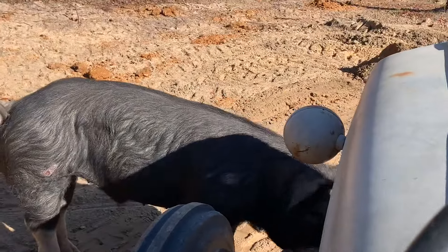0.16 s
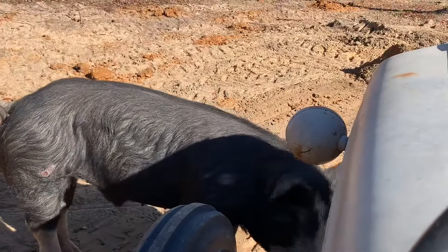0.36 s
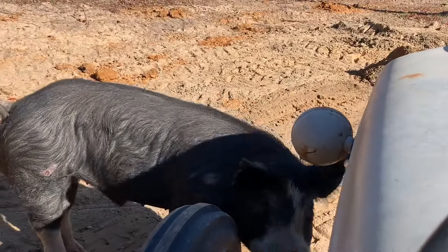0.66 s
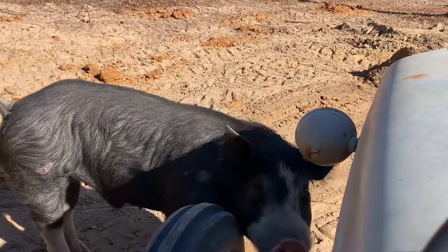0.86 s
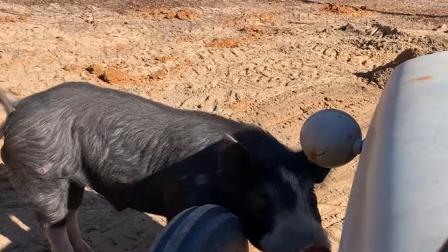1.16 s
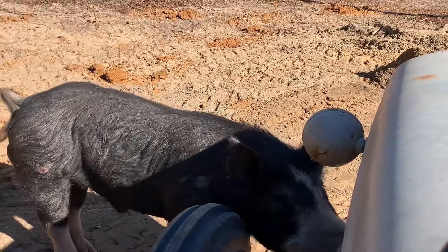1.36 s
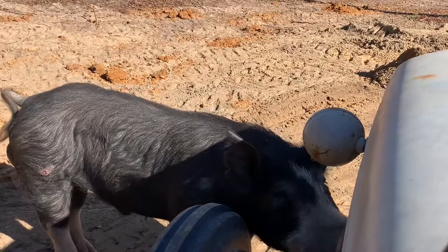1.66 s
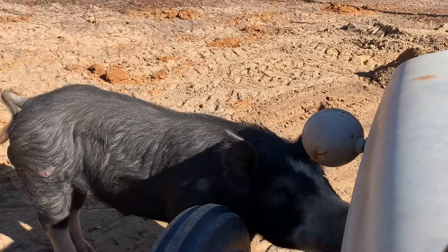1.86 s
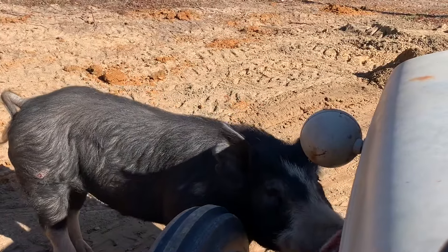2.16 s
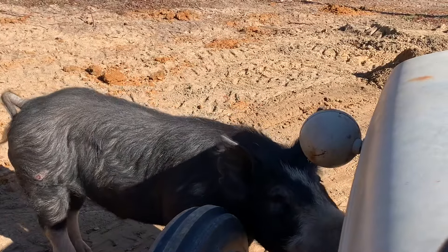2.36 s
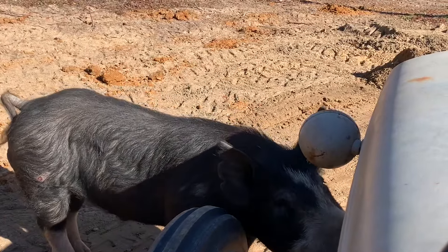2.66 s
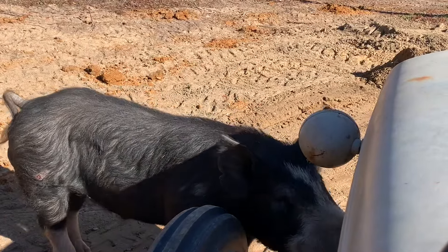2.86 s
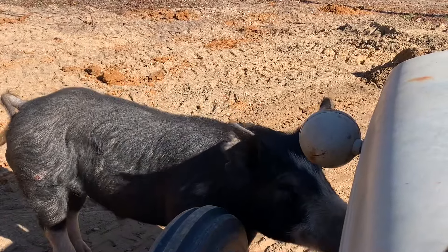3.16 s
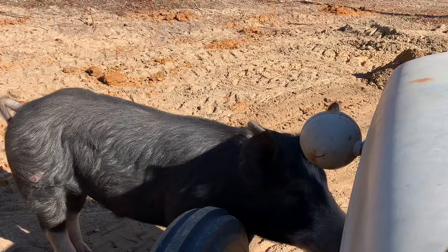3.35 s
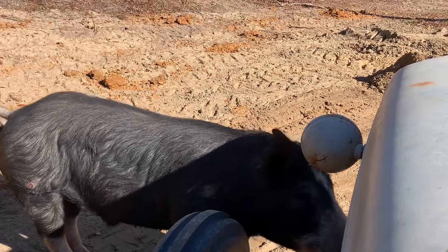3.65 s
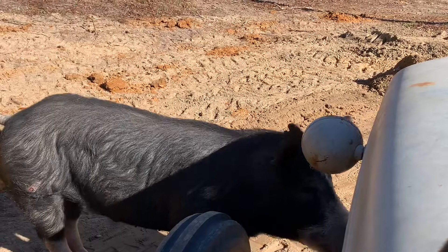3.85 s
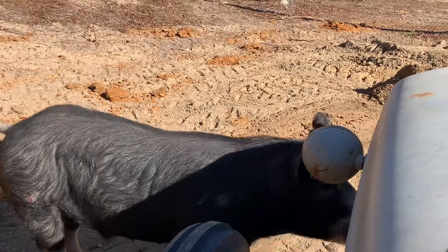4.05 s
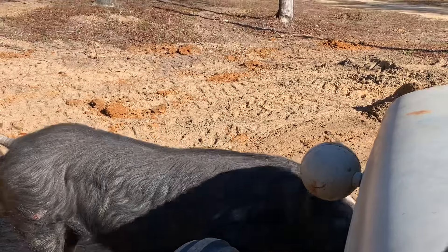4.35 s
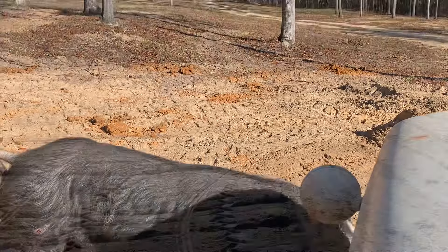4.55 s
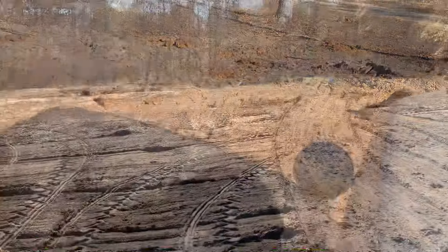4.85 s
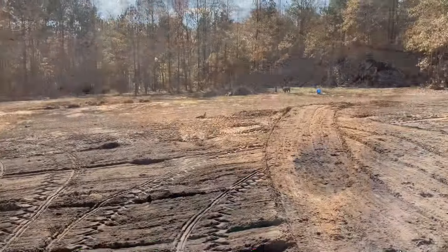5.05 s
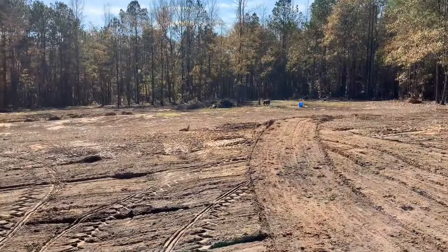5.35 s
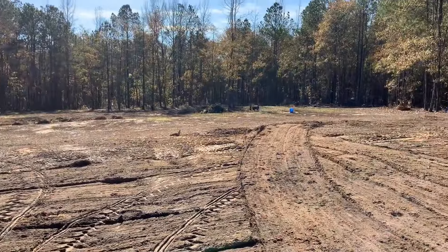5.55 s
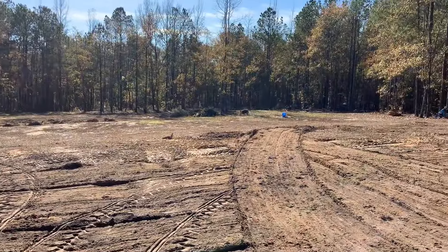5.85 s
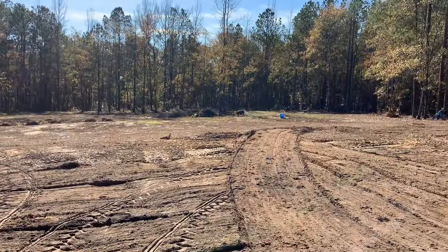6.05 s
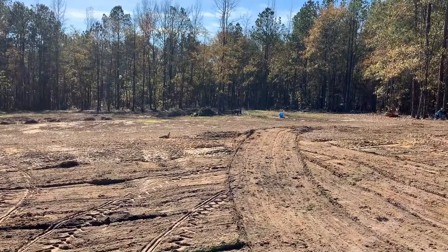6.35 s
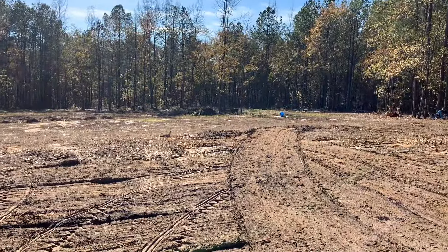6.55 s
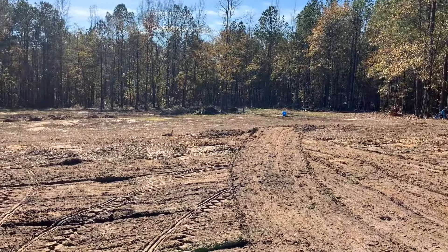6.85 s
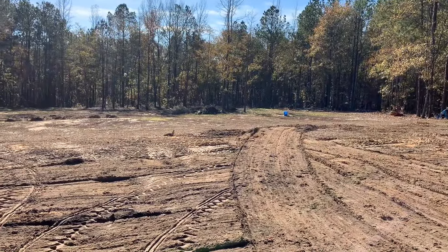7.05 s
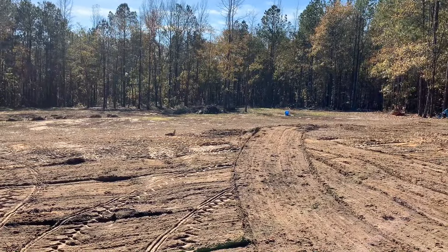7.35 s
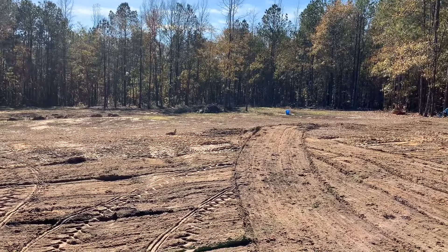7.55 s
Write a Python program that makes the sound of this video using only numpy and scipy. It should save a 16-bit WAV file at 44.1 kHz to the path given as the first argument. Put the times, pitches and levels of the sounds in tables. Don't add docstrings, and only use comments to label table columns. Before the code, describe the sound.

Very close outdoors, a pig gives a short sniff, then one loud, fluttering snort just after a second in. Breathy sniffs follow, with lip smacks and dull hollow booms as its head bumps a metal tank. A sharp hoof crack and a cluster of knocks and rustles lead into a softer open field, with a far low engine hum, scattered steps and a thin cricket.

```python
import sys
import numpy as np
from scipy import signal
from scipy.fft import rfft, irfft, next_fast_len
from scipy.io import wavfile
from scipy.ndimage import uniform_filter1d

SR = 44100
rng = np.random.default_rng(int(sys.argv[2]) if len(sys.argv) > 2 else 0)


def volts_from_db(level):
    exponent = np.asarray(level, float) / 20
    return 10 ** exponent


def dump(signal):
    limited = np.clip(np.atleast_2d(signal).T, -1, 1)
    pcm = np.round(limited * 32767).astype(np.int16)
    wavfile.write(sys.argv[1], SR, pcm)


N = 339119
T = np.arange(N) / SR

FADE_START_S, FADE_END_S = 4.45, 5.37
EDGE_DB, SQUARE = -28, 2.9


def evened(x):
    return x / np.sqrt(np.mean(x ** 2) + 1e-20)


def read(points, hz):
    f, value = np.transpose(points)
    return np.interp(np.log(hz + 1), np.log(f + 1), value)


def add(mix, s, sound):
    part = mix[..., round(s * SR):][..., :sound.shape[-1]]
    part += sound[..., :part.shape[-1]]


def resonate(x, hz, width):
    r, turn = np.exp(-np.pi * width / SR), np.cos(2 * np.pi * hz / SR)
    return 2 * (1 - r) * signal.lfilter([1, -r * turn], [1, -2 * r * turn, r * r], x)


def resonate_twice(x, hz, width):
    return resonate(resonate(x, hz, width), hz, width)


def butter(x, order, hz, kind):
    return signal.sosfilt(signal.butter(order, hz, kind, fs=SR, output="sos"), x)


def pair(same):
    a, b = rng.standard_normal((2, N))
    side = np.sqrt((1 - same) / (1 + same))
    return np.array([a + side * b, a - side * b])


def wander(rate_hz):
    return evened(resonate_twice(rng.standard_normal(N), 0, 2 * rate_hz))


def ring(modes, seconds):
    t = np.arange(round(seconds * SR)) / SR
    hz, db, t60 = np.transpose(modes)[:, :, None]
    return volts_from_db(db - 60 * t / t60) * np.sin(2 * np.pi * hz * t)


def strokes(start, length, db, sag_db=0):
    lean = 0.91
    power = np.zeros(N)
    for s, span, top_db in zip(start, length, db):
        at = slice(max(round(s * SR), 0), round((s + span) * SR))
        u = (T[at] - s) / span
        arch_db = EDGE_DB * abs(2 * np.clip(u, 0, 1) ** lean - 1) ** SQUARE
        power[at] += volts_from_db(top_db + arch_db + sag_db * (u - .5)) ** 2
    return np.sqrt(power)


def air(colour, patchy_db, gust_db):
    # frequency in Hz, likeness from 0 to 1.
    likeness = [(60, 0.95), (290, 0.92), (640, 0.077), (1400, 0.022), (4500, 0.02), (6500, 0.476),
                (16000, .99)]
    frames, hz = N // 512 + 5, np.fft.rfftfreq(2048, 1 / SR)
    a, b, c, d, patches = rng.standard_normal((frames, 1025, 5)).T
    patches = evened(uniform_filter1d(uniform_filter1d(patches, size=16, axis=0), size=6, axis=1))
    gust = evened(uniform_filter1d(rng.standard_normal(frames), size=12))
    same = np.clip(read(likeness, hz), 0, .999)[:, None]
    side = np.sqrt((1 - same) / (1 + same)) * (c + 1j * d)
    z = np.array([a + 1j * b + side, a + 1j * b - side]) * np.sqrt((1 + same) / 2)
    lumps_db = gust_db * gust / (1 + (hz[:, None] / 300) ** 2)
    z *= volts_from_db(read(colour, hz)[:, None] + patchy_db * patches + lumps_db)
    return evened(signal.istft(z, nperseg=2048, noverlap=1536)[1][:, :N])


def outdoors():
    # frequency in Hz, density in dB per Hz.
    yard_colour = [(15, -40.5), (25, -3), (85, 0), (284, -17), (454, -26), (511, -25.5), (678, -25),
                   (1060, -31.5), (1140, -39), (1310, -38), (2480, -47.5), (4070, -47.5), (7000, -55),
                   (9100, -81.5), (15400, -120)]
    field_colour = [(15, -47), (25, -9.5), (87, -8.5), (124, -15), (177, -19.5), (199, -23), (240, -23.5),
                    (304, -35), (376, -28.5), (523, -26), (678, -39), (879, -29), (1110, -40.5),
                    (1330, -40.5), (1550, -50.5), (7000, -60), (9100, -103), (15400, -120)]
    # frequency in Hz, density in dB per Hz.
    hiss_colour = [(5000, -34.5), (6500, 0), (9000, 1), (12000, 1.5), (13600, 0)]
    hiss_top = [(14100, -10), (14500, -34), (16000, -40)]
    # time in seconds, level in dB.
    hiss_level = [(0, -86), (4.5, -85), (5.0, -89), (7.69, -87.5)]
    # time in seconds, gain in dB.
    breeze = [(0, 0), (3.2, 0.2), (4.6, 2.5), (5.0, -11), (6.1, -8.5), (6.5, -20), (6.9, -46.5)]
    yard_db, field_db = -54, -55.5
    fade = np.pi / 2 * np.clip((T - FADE_START_S) / (FADE_END_S - FADE_START_S), 0, 1)
    yard = volts_from_db(yard_db + np.interp(T, *np.transpose(breeze))) * air(yard_colour, patchy_db=1.2, gust_db=.6)
    field = volts_from_db(field_db) * air(field_colour, patchy_db=1.2, gust_db=.6)
    hiss = air(hiss_colour + hiss_top, patchy_db=4.5, gust_db=-4)
    hiss = volts_from_db(np.interp(T, *np.transpose(hiss_level))) * hiss
    return yard + np.sin(fade) * field + hiss


def engine():
    # start in seconds, length in seconds, gain in dB.
    lulls = [
        (5.022, 0.068, -26),
        (5.18, 0.088, -11),
        (6.478, 0.11, -26),
        (7.642, 0.11, -25),
    ]
    firing_hz, waver_hz = 83.8, 1.07
    first_db, grows_db_per_s = -58.5, 2.35
    second_db, sags_db_per_s, sag_start_s = -65, 12, 6.45
    turns = np.cumsum(firing_hz + waver_hz * wander(5.47)) / SR
    heard = np.clip((T - FADE_START_S) / (FADE_END_S - FADE_START_S), 0, 1)
    lull_db = sum(db * np.clip(1 - abs(2 * (T - s) / span - 1), 0, 1) for s, span, db in lulls)
    first_db = first_db + grows_db_per_s * (T - FADE_END_S) + lull_db
    first_db = first_db + 1.2 * wander(3.6) + 2.5 * wander(12)
    second_db = second_db - sags_db_per_s * np.maximum(T - sag_start_s, 0) + 1.6 * wander(4.1)
    hum = volts_from_db(first_db) * np.sin(2 * np.pi * turns) + volts_from_db(second_db) * np.sin(4 * np.pi * turns)
    return np.sqrt(2) * np.sin(np.pi / 2 * heard) * hum


def cricket():
    start_s, end_s = 5.25, 6.42
    throb = 1 + .4 * np.sin(2 * np.pi * 30 * T + 2 * wander(5))
    throb = throb * volts_from_db(2.5 * wander(8)) * (T > start_s) * (T < end_s)
    line = evened(resonate_twice(rng.standard_normal(N), 5050, 80))
    return volts_from_db(-95.5) * throb * line * volts_from_db([[3.], [-3.]])


def ticks():
    # time in seconds, peak in dB, centre in Hz, width in Hz, length in seconds.
    snaps = [(0.774, -64, 2490, 504, .006), (1.673, -65, 2260, 500, 0.0073), (1.92, -63, 9100, 9100, .002),
             (3.518, -54, 11200, 6700, .002), (3.954, -64, 5460, 1490, 0.0027),
             (4.045, -70, 5700, 2480, .003), (4.467, -48.5, 2880, 2400, 0.0023),
             (4.504, -48, 4070, 1980, 0.0022), (5.192, -60, 8460, 1194, 0.019),
             (5.664, -68.5, 6000, 3030, 0.028), (5.706, -71, 2450, 301, 0.014),
             (5.733, -78.5, 2490, 297, .008), (6.084, -68.5, 7530, 3000, 0.0048),
             (6.18, -53.5, 5900, 5000, 0.0028), (6.51, -67, 9900, 5960, 0.0022),
             (6.791, -65, 12020, 5930, 0.0028), (6.238, -72, 3930, 4030, 0.12),
             (1.102, -49, 2023, 250, 0.0057), (1.114, -58, 4260, 400, 0.0087),
             (1.131, -60, 4350, 395, 0.0064), (1.152, -52, 4350, 400, .006), (1.2, -54, 5500, 301, 0.0073),
             (7.651, -66.5, 4350, 1510, 0.00213)]
    smacks = [(0.87, -68, 11000, 5000, .002), (0.99, -63, 11000, 5000, .002),
              (1.051, -60, 10100, 6000, 0.0017), (1.065, -59.5, 6400, 5000, 0.0015),
              (1.078, -65, 7000, 4000, .002), (2.803, -60, 7040, 8000, 0.0035),
              (2.519, -64, 795, 505, 0.0036), (2.556, -70, 800, 499, 0.0036),
              (3.215, -54, 2020, 2500, .003), (4.147, -58.5, 2500, 700, 0.00072),
              (4.1495, -48, 537, 300, 0.0027), (2.394, -56, 700, 500, 0.0035),
              (2.599, -65.5, 870, 200, 0.0057), (2.314, -71, 4000, 800, 0.0038),
              (5.1, -63.5, 1690, 600, 0.0087), (5.201, -60, 1300, 700, 0.00336),
              (5.675, -62, 1730, 300, .006), (6.088, -68, 1670, 300, .005), (4.1, -75, 5700, 1000, 0.0037),
              (4.726, -55, 5000, 6000, 0.0011), (6.42, -73, 3000, 4000, 0.0022)]
    out = np.zeros(N)
    for s, db, hz, width, length in snaps + smacks:
        t = np.arange(round(6 * length * SR) + 200) / SR
        puff = rng.standard_normal(len(t)) * t * np.exp(-2 * t / length)
        snap = resonate_twice(puff, hz, width)
        add(out, s - length / 2, volts_from_db(db) * snap / abs(snap).max())
    return out


def rustle():
    # start in seconds, length in seconds, level in dB.
    slides = [
        (4.333, 0.33, -76.5),
        (4.572, 0.14, -71.5),
        (4.696, 0.09, -78),
    ]
    rub = resonate_twice(pair(0), 8500, 1800)
    return strokes(*np.transpose(slides)) * evened(rub)


def thud(turns=0.936, low_hz=34):
    t = np.arange(SR // 5) / SR
    swell = np.exp(-(t / .034) ** 2) * (1 - np.exp(-t / .003))
    return swell * np.sin(2 * np.pi * (low_hz * t + turns * np.log1p(t / .001)))


def crack():
    t = np.arange(-90, 260) / SR
    swing = np.cos(2 * np.pi * (900 * t - 110000 * t * abs(t)) - .1)
    return swing * np.exp(-(t / np.where(t < 0, .0008, .0016)) ** 2)


def knocks():
    # time in seconds, peak in dB, colour in Hz, t60 in seconds, ground thud in dB.
    hits = [(0.275, -54, 674, 0.31, -78), (3.247, -68, 643, 0.044, -61), (4.191, -47, 870, 0.041, -66),
            (4.299, -54, 665, 0.042, -69), (4.343, -52.5, 875, 0.057, -68), (4.466, -50, 830, 0.05, -74),
            (4.504, -54, 980, 0.037, -43.5), (4.675, -42.5, 970, 0.18, -49), (4.857, -45, 815, 0.14, -69),
            (4.649, -55, 604, .08, -70), (4.792, -51, 500, .05, -67), (4.837, -49, 840, 0.11, -68),
            (4.884, -51, 620, 0.049, -70), (5.039, -63.5, 700, .05, -72), (5.24, -62, 780, 0.042, -78),
            (5.326, -63, 900, .05, -72), (5.463, -61.5, 600, .08, -79), (5.654, -61, 800, 0.058, -72),
            (5.745, -58, 950, 0.063, -77), (5.777, -58, 900, 0.1, -70), (5.903, -57, 598, .05, -72.5),
            (4.949, -53.5, 655, 0.14, -67.5), (5.097, -46, 680, 0.063, -50.5), (5.101, -42, 870, 0.11, -72),
            (5.121, -51, 900, 0.037, -60), (5.2, -59, 894, 0.038, -73), (5.271, -55.5, 847, 0.047, -66.5),
            (5.39, -35, 730, 0.033, -44.5), (5.41, -50, 885, 0.053, -49), (5.511, -45.5, 795, 0.027, -49),
            (5.674, -42.5, 665, 0.086, -57), (5.684, -51, 838, 0.046, -60), (6.086, -43.5, 800, 0.041, -48)]
    # time in seconds, level in dB, treble turns, last pitch in Hz, crack in dB.
    blows = [
        (4.147, -31, .8, 34, -27.5),
        (4.521, -38, .05, 55, -70),
        (1.166, -34, .05, 95, -70),
    ]
    out, t = np.zeros((2, N)), np.arange(SR // 8) / SR
    side = volts_from_db([[1.], [-1.]])
    for s, db, hz, t60, thud_db in hits:
        grit = rng.standard_normal(len(t)) * volts_from_db(-60 * t / t60)
        body = resonate_twice(grit, hz, 300) + 5.0 * resonate_twice(grit, 0.71 * hz, 490)
        body = butter(body, 4, 1400, "low")
        add(out, s, side * volts_from_db(db) * body / abs(body).max())
        add(out, s, volts_from_db(thud_db) * thud())
    for s, db, turns, low_hz, crack_db in blows:
        add(out, s - .0011, volts_from_db(crack_db) * crack())
        add(out, s, volts_from_db(db) * thud(turns, low_hz))
    return out


def tank():
    # frequency in Hz, level in dB, t60 in seconds.
    shell = [(173.3, -6, .5), (200.4, 1, 0.23), (237, 3.5, 0.47), (255.5, -11.5, 1.4), (296.3, 6, 0.097),
             (301.3, -7.5, 0.95), (350, -8, 1.85), (420, -5.5, 0.63), (503, 0.5, 0.66), (625, -2, 0.4),
             (840, -2, 0.54), (1180, -6, .1)]
    # time in seconds, peak in dB, colour in Hz, focus in dB per octave.
    bumps = [
        (2.342, -42.5, 420, 15.5),
        (2.357, -34.5, 283.5, 16),
        (2.385, -35.5, 303, 20.5),
        (2.455, -47.5, 324, 15.5),
        (3.011, -39, 210, 47),
        (3.045, -45.5, 237, 44),
        (5.74, -49, 232.4, 28),
    ]
    contact_db, contact_s = 12, 0.014
    out, modes, waver = np.zeros(N), ring(shell, 1.0), wander(28)
    count = modes.shape[1]
    t = T[:count]
    modes = modes * (1 - np.exp(-t / .003))
    for s, db, hz, focus_db in bumps:
        near_db = -focus_db * abs(np.log2(np.transpose(shell)[0] / hz))
        start = rng.integers(0, N - SR, (len(shell), 1))
        waver_db = 6 * waver[start + np.arange(count)] * np.minimum(t / .06, 1)
        press_db = contact_db * np.exp(-t / contact_s)
        boom = (modes * volts_from_db(near_db[:, None] + waver_db + press_db)).sum(axis=0)
        boom = np.convolve(boom, np.hanning(40))
        add(out, s, volts_from_db(db) * boom / abs(boom[:SR // 20]).max())
    return out


def jets():
    # start in seconds, length in seconds, level in dB, centre in Hz, width in Hz.
    bursts = [(1.097, 0.14, -61, 4260, 350), (1.09, .04, -66, 3000, 2500), (1.2, 0.08, -64, 6100, 1500),
              (1.284, 0.036, -54.5, 597, 500), (2.395, .1, -75.5, 4440, 1800), (2.428, .05, -75, 3600, 298),
              (2.898, .07, -78, 1840, 130), (2.96, .04, -79, 1844, 130), (3.005, .1, -66.5, 6740, 900),
              (3.0, 0.2, -68, 1590, 1510), (2.902, 0.11, -87, 3500, 4000), (3.158, .09, -73.5, 3500, 3500),
              (4.303, 0.1, -79, 4600, 1000), (4.496, 0.073, -75, 4600, 900), (1.223, 0.13, -56, 270, 200),
              (3.533, 0.16, -70.5, 2580, 1405), (3.754, 0.27, -77, 2100, 900),
              (3.756, 0.14, -73, 4600, 710), (4.174, 0.094, -74.5, 4750, 1200),
              (4.423, 0.13, -70, 2250, 600), (4.559, .16, -68.5, 2440, 700), (4.58, 0.11, -68.5, 4500, 800),
              (4.696, 0.14, -74, 880, 800), (4.922, .18, -81.5, 900, 890), (5.25, 0.32, -81, 1086, 800),
              (5.496, 0.64, -84, 1097, 800)]
    out = np.zeros((2, N))
    for s, length, db, hz, width in bursts:
        a, b = rng.standard_normal((2, SR))[:, :round(length * SR)]
        band = resonate_twice(np.array([a + .4 * b, a - 1.2 * b]), hz, width)
        u = np.linspace(-1, 1, len(a))
        add(out, s, volts_from_db(db + EDGE_DB * abs(u) ** SQUARE) * evened(band))
    return out


def reshaped(x, patchy_db):
    hz, t, z = signal.stft(x, SR, nperseg=512)
    patches = rng.standard_normal((len(t), len(hz))).T
    patches = evened(uniform_filter1d(uniform_filter1d(patches, size=3, axis=0), size=16, axis=1))
    return signal.istft(z * volts_from_db(patchy_db * patches), SR, nperseg=512)[1][:, :N]


def flutter():
    start_s, end_s, rate_hz, open_s, depth_db = 1.09, 1.215, 44, 1.172, 6
    gate_db = depth_db * np.cos(2 * np.pi * rate_hz * (T - open_s)) * (T > start_s) * (T < end_s)
    return volts_from_db(1.6 * wander(60) + gate_db)


def breathing():
    # frequency in Hz, width in Hz, level in dB.
    nose_peaks = [(2400, 700, 2), (3107, 450, -2.5), (3600, 560, 3), (4350, 870, -0.5), (5650, 1003, -7),
                  (6560, 903, -1)]
    throat_peaks = [(455, 143, 5.5), (656, 400, -4.5), (940, 300, -11), (1418, 311, -6)]
    # start in seconds, length in seconds, effort in dB, throat over nose in dB,
    # wet nostrils over nose in dB.
    breaths = [(-.07, 0.12, -66, 4, -10.5), (0.199, 0.034, -90, 14, 9), (0.266, 0.15, -67.5, 6.5, -13),
               (0.927, 0.48, -85.5, -7, 4.5), (1.091, 0.15, -63.5, 17, -16), (1.146, 0.11, -54.5, 9, -13),
               (1.171, 0.17, -50, 0.1, -4), (1.741, 0.19, -83.5, 2.5, 2.5), (1.969, 0.2, -55, 0.1, -6),
               (2.326, 0.2, -79, 12, -6), (2.773, 0.19, -73, 4.5, -6.5), (2.976, 0.218, -65.5, -1, -0.8),
               (3.167, 0.03, -72, 8, 8), (3.2, 0.22, -57, 6, -3.5), (3.394, 0.17, -87, 10, 4.5),
               (3.52, 0.098, -79, 9, 10), (3.576, 0.16, -76, 7, -7), (3.655, 0.1, -81, 0, 7.5),
               (3.703, 0.33, -67.5, 6.5, -13.5), (4.134, 0.18, -79, 1.5, -8), (4.281, 0.16, -70, -2, -12.5),
               (4.41, 0.21, -68.5, 10, -14), (4.524, 0.26, -68.5, 8, -14.5),
               (4.667, 0.29, -78.5, 12.5, -23)]
    # start in seconds, length in seconds, level in dB.
    whistles = [(1.16, 0.063, -47), (1.265, 0.1, -70), (2.339, 0.039, -63), (3.03, 0.17, -69.5),
                (3.248, 0.17, -58.5), (3.68, .07, -75), (4.135, 0.14, -69), (4.316, 0.06, -61.5),
                (4.57, 0.13, -73)]
    same = .8
    tiring_db, drying_db = -4.5, -5.5
    tip_hz, tip_share, tip_db = 5000, 0.94, -3.5
    leak_db = -24
    s, length, effort_db, throat_db, wet_db = np.transpose(breaths)

    nose = sum((-1) ** k * volts_from_db(db) * resonate_twice(pair(same), hz, 1.52 * width)
               for k, (hz, width, db) in enumerate(nose_peaks))
    nose = evened(butter(reshaped(nose, patchy_db=2.4), 6, 7500, "low"))
    base_level = strokes(s, length, effort_db, tiring_db)
    tip_level = strokes(s, length, effort_db + tip_share * np.minimum(wet_db, 0) + tip_db)
    hiss = butter(nose, 4, tip_hz, "low") * base_level + butter(nose, 4, tip_hz, "high") * tip_level

    throat = sum(volts_from_db(db) * resonate_twice(pair(same), hz, 2.0 * width) for hz, width, db in throat_peaks)
    rush = strokes(s, length, effort_db + throat_db)
    throat = rush * evened(reshaped(throat, patchy_db=2.2))

    fizz = evened(butter(pair(1.0), 4, [7400, 15800], "band"))
    fizz = fizz * strokes(s, length, effort_db + wet_db + 5.0, drying_db)

    whistle = evened(resonate_twice(pair(same), 1120, 120))
    whistle = whistle * (strokes(*np.transpose(whistles)) + volts_from_db(leak_db) * rush)
    return flutter() * (hiss + throat + fizz + whistle)


def snort():
    # frequency in Hz, level in dB, t60 in seconds.
    snout = [(214.3, -7, 0.067), (479.5, -11, 0.05), (1075, -11, 0.07), (1340, -6, 0.035),
             (1565, -2, 0.014), (1790, 1, 0.075), (2800, -3, 0.025), (3227, -10, 0.02), (3620, -8, .022),
             (4360, -13, 0.025)]
    # time in seconds, peak in dB, air push in dB, open time in seconds.
    flaps = [
        (1.1005, -52, -55, .008),
        (1.1243, -43.5, -35.5, 0.023),
        (1.1422, -47.5, -27.5, .003),
        (1.1471, -30.5, -54.5, 0.015),
        (1.1645, -28, -22, 0.0027),
        (1.1686, -17.5, -41.5, 0.018),
        (1.1862, -37.5, -51, .0025),
        (1.1905, -22, -23.5, 0.0083),
        (1.213, -62.5, -23.5, .01),
        (1.232, -58, -36.5, .01),
    ]
    shell_echo_db = -8.5
    out, t = np.zeros(N), np.arange(SR // 12) / SR
    modes = ring(snout, len(t) / SR).sum(axis=0) * (1 - np.exp(-t / 0.0003))
    for s, db, push_db, open_s in flaps:
        spit = (1.2 + .3 * rng.standard_normal(30)) * np.exp(-np.arange(30) / 2.66)
        slap = np.convolve(modes / (1 + (t / open_s) ** 6), uniform_filter1d(spit, size=5))
        add(out, s, volts_from_db(db) * slap / abs(slap).max())
        add(out, s - .007, volts_from_db(push_db) * np.sin(2 * np.pi * 50 * t) * volts_from_db(-60 * t / 0.04))
    return out + volts_from_db(shell_echo_db) * resonate(out, 560, 350) * np.array([[1], [-1]])


def scene():
    surroundings = outdoors() + engine() + cricket()
    contacts = ticks() + rustle() + knocks() + tank()
    return surroundings + contacts + jets() + breathing() + snort()


def low_pass(x):
    return signal.sosfilt(signal.butter(12, 16140, fs=SR, output="sos"), x)


def record(dry):
    # frequency in Hz, radians by which the left leads.
    ports = [(0, .35), (1000, .55), (4700, .75), (6500, 0), (8500, -3.14), (11000, -6.28), (13400, -9.42),
             (15700, -12.56)]
    # time in seconds, frequency in Hz under which the ports are summed.
    mono_bass = [(4.45, 5), (4.6, 720), (4.9, 940), (5.8, 750), (6.6, 473), (7.69, 99)]
    low_hz, high_hz = 38, 15900
    size = next_fast_len(N + 4096)
    hz = np.fft.rfftfreq(size, 1 / SR)
    lead = np.interp(hz, *np.transpose(ports)) / 2
    band = (hz < high_hz) * hz ** 3 / np.sqrt(hz ** 6 + low_hz ** 6)
    turn = np.exp(1j * np.array([lead, -lead]))
    left, right = irfft(rfft(dry, size) * band * turn, size)[:, :N]
    hz, t, side = signal.stft((left - right) / 2, SR, nperseg=1024)
    side = side * (hz[:, None] >= np.interp(t, *np.transpose(mono_bass)))
    side = signal.istft(side, SR, nperseg=1024)[1][:N]
    return low_pass((left + right) / 2 + np.array([side, -side]))


dry = scene()
out = record(dry)
dump(out)
```